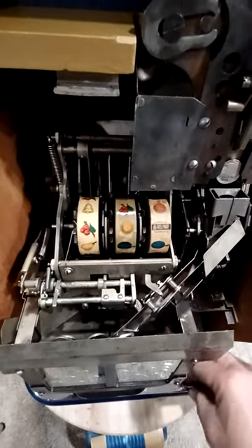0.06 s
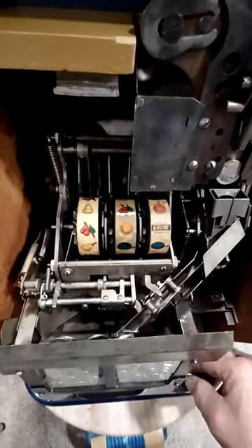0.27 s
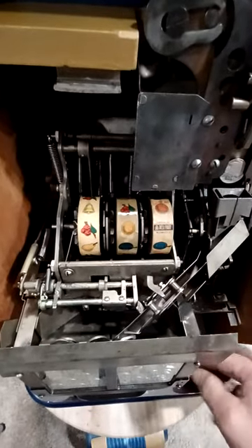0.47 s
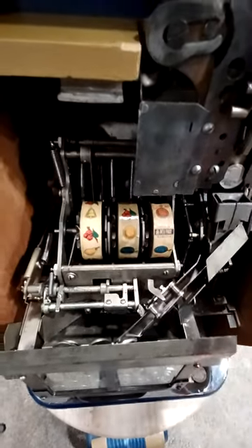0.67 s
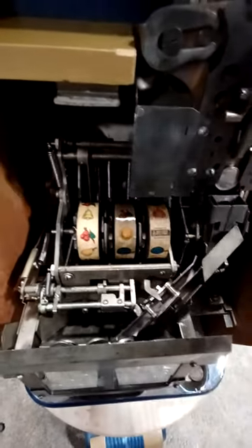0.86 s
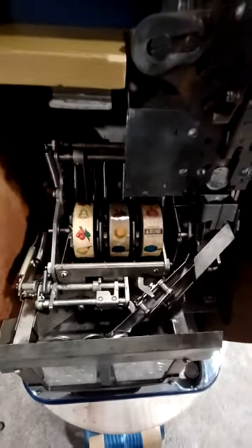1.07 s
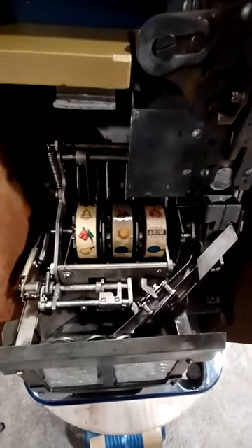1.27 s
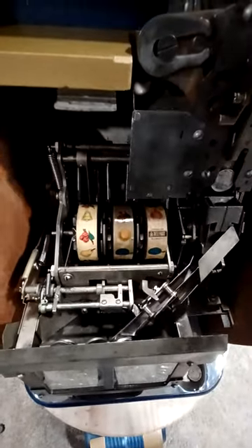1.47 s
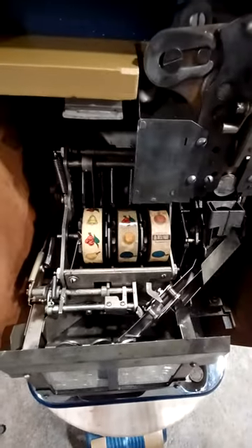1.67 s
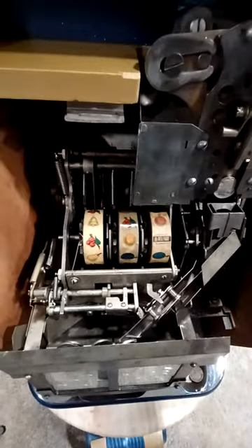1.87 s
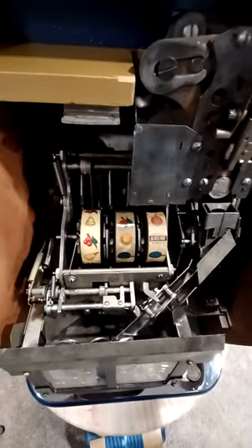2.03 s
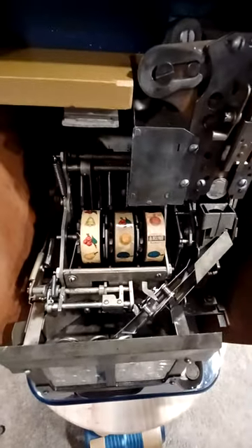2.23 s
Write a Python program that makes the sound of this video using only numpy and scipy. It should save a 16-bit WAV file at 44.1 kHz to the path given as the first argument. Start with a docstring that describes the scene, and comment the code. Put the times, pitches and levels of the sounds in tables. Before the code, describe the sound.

Heard up close in a small room, an old slot machine gives a loud metal clack over whirring gears and thin spring scrapes. The whir dies away, followed by irregular sharp clicks, brief rasps and a light hollow clunk.

```python
"""A small room, a stereo microphone close to the open mechanism of an old slot machine as it cycles.
The clockwork whirs and runs down while a heavy lever clacks home and a spring sticks and scrapes.
Then steel pawls and latches click at uneven times, each shaking the frame; a latch rasps over its
catch, and parts clunk to rest on the hollow housing. The near walls add a short tail."""
import sys
import numpy as np
from scipy import signal
from scipy.fft import rfft, irfft
from scipy.io import wavfile

SR = 44100
rng = np.random.default_rng(int(sys.argv[2]) if len(sys.argv) > 2 else 0)


def bounce(signal):
    """Save signal as a 16-bit WAV file at the path given by the first command-line argument."""
    frames = np.transpose(np.atleast_2d(signal))
    limited = np.clip(frames, -1, 1)
    pcm = np.round(limited * 32767).astype(np.int16)
    wavfile.write(sys.argv[1], SR, pcm)


N = 101429

# the lever's blows: start_s, body_db, treble_db
LEVER_BLOWS = [(.1798, -32, -22), (.1848, -23.5, -14), (.1878, -21, -22), (.1908, -28, -16),
               (.2333, -37, -28), (.369, -42.5, -22.5)]
# its dense clash as a spectrum: freq_hz, level_db
LEVER_SPECTRUM = [(530, -31), (900, -16), (1570, -3.5), (2660, -5.5), (4920, -4), (9090, -12.5), (11600, 0),
                  (16000, -8.5)]
# its distinct modes: pitch_hz, level_db, t60_s
LEVER_MODES = [(2080, -9.5, 0.26), (2900, -7.5, 0.1), (4140, -9, 0.044), (4930, 0, 0.028),
               (6300, 6.5, 0.025), (6780, -1, .06), (13800, 6, 0.029)]
def lever():
    """The heavy lever clacks home, steel on steel, close to the microphone."""
    return steel(LEVER_BLOWS, LEVER_SPECTRUM, LEVER_MODES, dense_t60_s=0.064, modes_db=-7.5,
                 body_gain_db=1, treble_gain_db=-10.5, frame_db=-21.5)


# latch snaps: start_s, body_db, treble_db
LATCH_SNAPS = [(1.4153, -42, -19.5), (1.422, -27.5, -60), (1.431, -30, -25.5), (1.4849, -31.5, -25),
               (1.524, -36.5, -36), (1.569, -44.5, -41.5), (1.69, -23.5, -18.5), (1.7155, -31, -27),
               (1.784, -26, -22), (1.8016, -32, -29), (1.822, -34, -31), (1.853, -36, -35.5),
               (1.895, -32, -37), (1.99, -34.5, -25.5), (2.0105, -30, -25.5), (2.05, -44, -36.5),
               (2.138, -43.5, -53), (2.191, -39, -49.5), (2.233, -48.5, -55)]
# a latch's dense clash as a spectrum: freq_hz, level_db
LATCH_SPECTRUM = [(1000, -54), (1590, -12.5), (2050, -5), (3050, -11.5), (4020, -5.5), (7350, -14.5),
                  (13300, -3.5), (16000, -2.5)]
# its distinct modes: pitch_hz, level_db, t60_s
LATCH_MODES = [(1980, -4, .035), (2080, -.5, .065), (2486, -6, .06), (3930, -6, .07), (5300, -3, .035),
               (5650, -8, .045), (6640, -7, .045), (8800, -11, .04), (10700, -7, .05), (13350, 8, .065),
               (15700, 0, .06)]
def latches():
    """Bright latches snap and rebound."""
    return steel(LATCH_SNAPS, LATCH_SPECTRUM, LATCH_MODES, dense_t60_s=0.14, modes_db=-1.5,
                 body_gain_db=-4.5, treble_gain_db=-3.5, frame_db=-17)


# pawl drops: start_s, body_db, treble_db
PAWL_DROPS = [(1.0653, -38, -31.5), (1.1062, -36, -27), (1.1122, -27, -31), (1.154, -28, -38.5),
              (1.288, -41.5, -40.5), (1.3137, -32, -29), (1.317, -22, -30.5), (1.331, -30.5, -35),
              (1.353, -46, -33.5), (1.3585, -33, -32.5)]
# a pawl's dense clash as a spectrum: freq_hz, level_db
PAWL_SPECTRUM = [(590, -59.5), (1000, -27), (1850, 4.5), (3120, -2), (3580, 10.5), (4680, -10.5),
                 (6550, -9), (8260, -31), (12700, -20), (16000, -18.5)]
# its distinct modes: pitch_hz, level_db, t60_s
PAWL_MODES = [(1870, -8, .33), (2070, -8, .08), (2560, 4, .03), (3480, 2, .03), (3700, 0, .04),
              (13700, -6, .04)]
def pawls():
    """Light pawls drop with short clicks."""
    return steel(PAWL_DROPS, PAWL_SPECTRUM, PAWL_MODES, dense_t60_s=0.048, modes_db=-3.5,
                 body_gain_db=-5, treble_gain_db=-2, frame_db=-27)


# the frame's dense modes as a spectrum: freq_hz, level_db
FRAME_SPECTRUM = [(70, -37.5), (130, -0.5), (180, -35.5), (250, 14), (380, -4), (900, -15), (1600, -7.5),
                  (4000, -61)]
# its distinct modes: pitch_hz, level_db, t60_s
FRAME_MODES = [(153, -20, 0.18), (238.9, 1.5, 0.18), (281.8, 5, 0.16), (375, -10.5, .22), (871, -11, 0.29)]
def steel(blows, spectrum, modes, dense_t60_s, modes_db, body_gain_db, treble_gain_db, frame_db):
    """Steel on steel: a contact crack, a dense clash, a few ringing pitches, the frame swelling after."""
    out, t = np.zeros((2, N)), np.arange(SR // 3) / SR
    contact_s, frame_attack_s = .0004, .008
    crack = undb(6.5) * fade(t, t60_s=.012)
    envelope = (fade(t, dense_t60_s) + crack) * rise(t, contact_s)
    for start_s, body_db, treble_db in blows:
        hit = at_level(noise(spectrum, len(t)) * envelope, 0) + at_level(ring(modes, t), modes_db)
        body, treble = split(hit, hz=8230)
        shake = at_level(noise(FRAME_SPECTRUM, len(t)) * fade(t, 0.19), 0)
        shake += at_level(ring(FRAME_MODES, t), 0.52)
        add(out, start_s, at_level(body, body_db + body_gain_db))
        add(out, start_s, at_level(treble * fade(t, .16), treble_db + treble_gain_db))
        add(out, start_s, at_level(shake * rise(t, frame_attack_s, power=2), body_db + frame_db))
    return out


# scrapes of the spring: start_s, length_s, level_db
SCRAPES = [(0.225, 0.018, -35.5), (0.271, 0.031, -33), (0.305, .022, -30.5), (0.399, 0.03, -22),
           (0.433, 0.039, -37.5), (0.502, 0.051, -33), (0.598, 0.043, -46.5)]
# their hiss: freq_hz, level_db
SPRING_SPECTRUM = [(3000, -14), (6000, -16.5), (8500, -21.5), (9300, -14.5), (9700, 3), (10400, -14),
                   (12500, -16.5), (13500, 2.5), (13980, 3.5), (14300, 1), (16000, -26.5)]
def spring(slip_hz=170, sing_hz=14015, sing_db=-18):
    """A spring sticks and slips along its seat, and sings on thinly after each scrape."""
    out, t = np.zeros((2, N)), np.arange(SR) / SR
    for start_s, length_s, level_db in SCRAPES:
        slips = bursts(ticks(slip_hz, jitter=.3, scatter_db=1.5), t60_s=0.059)[-len(t):]
        envelope = rise(t, 0.002) * fade(np.maximum(t - length_s / 2, 0), t60_s=0.023)
        sing = np.sin(2 * np.pi * (rng.normal(sing_hz, 25) * t + rng.random((2, 1)))) * fade(t, 1.1)
        scrape = noise(SPRING_SPECTRUM, len(t)) * slips * envelope
        add(out, start_s, undb(level_db) * (scrape + undb(sing_db) * sing))
    return out


# dull knocks on the casing: start_s, level_db
KNOCKS = [(.187, -27.5), (0.237, -33.5), (0.371, -30), (1.111, -42.5), (1.36, -41.5), (1.716, -43),
          (2.004, -42.5)]
# the casing's dense modes as a spectrum: freq_hz, level_db
CASING_SPECTRUM = [(100, -36.5), (300, 7), (600, -1.5), (880, 4), (1500, -5.5), (2500, 0), (6000, -57)]
# its distinct modes: pitch_hz, level_db, t60_s
CASING_MODES = [(235.4, 6.5, 0.11), (679, 1.5, 0.027), (820, -1, .05), (900, -2, .05), (1155, -4, 0.05),
                (1585, -4.5, 0.05)]
# thuds of the whole machine on its stand: start_s, level_db
THUDS = [(0.19, -29.5), (0.374, -45), (1.422, -49)]
# the stand's low thump: freq_hz, level_db
STAND_SPECTRUM = [(25, -23.5), (70, -12.5), (130, -5), (200, -9.5), (600, -43.5)]
def casing():
    """Dull knocks ring the casing; a few blows also thump the stand."""
    out, t = np.zeros((2, N)), np.arange(SR // 3) / SR
    for start_s, level_db in KNOCKS:
        knock = at_level(noise(CASING_SPECTRUM, len(t)) * fade(t, 0.13), 0)
        knock += at_level(ring(CASING_MODES, t), -5.1)
        add(out, start_s, at_level(knock * rise(t, 0.0045), level_db))
    for start_s, level_db in THUDS:
        thud = noise(STAND_SPECTRUM, len(t)) * fade(t, 0.064) * rise(t, 0.0019)
        add(out, start_s, at_level(thud, level_db))
    return out


# drags of a latch: start_s, length_s, level_db
DRAGS = [(1.404, .014, -43), (1.603, 0.039, -46), (1.683, 0.0082, -28), (1.789, 0.015, -26.5),
         (1.878, 0.032, -31), (1.995, 0.024, -26)]
def latch_drags(bounce_hz=380):
    """A latch drags over its catch: tiny bounces run together into a short rasp."""
    out, t = np.zeros((2, N)), np.arange(SR // 3) / SR
    for start_s, length_s, level_db in DRAGS:
        chatter = bursts(ticks(bounce_hz, jitter=.5, scatter_db=2), t60_s=.012)[:len(t)]
        release = fade(np.maximum(t - length_s, 0), t60_s=.024)
        add(out, start_s, undb(level_db) * noise(LATCH_SPECTRUM, len(t)) * chatter * release)
    return out


# parts landing on the housing: start_s, level_db
CLUNKS = [(2.14, -37), (2.193, -47.5)]
# the housing's walls: pitch_hz, level_db, t60_s
WALL_MODES = [(715, 0, .045), (790, -6, .12), (1040, -3, .04), (1520, 0, .05), (1900, -1, .035)]
def housing_clunks(cavity_hz=272, cavity_t60_s=.035, wall_db=-5, rattle_db=-4):
    """A part comes to rest on the hollow housing: the walls ring at once, the cavity booms just after."""
    out, t = np.zeros((2, N)), np.arange(SR // 3) / SR
    onset = rise(t, 0.00045)
    for start_s, level_db in CLUNKS:
        boom = at_level(ring([(cavity_hz, 0, cavity_t60_s)], t) * rise(t, .012, power=4), level_db)
        walls = at_level(ring(WALL_MODES, t) * onset, level_db + wall_db)
        rattle = at_level(noise(CASING_SPECTRUM, len(t)) * fade(t, 0.14) * onset, level_db + rattle_db)
        add(out, start_s, boom + walls + rattle)
    return out


# the drive running down: time_s, tooth_db, rumble_db
DRIVE_LEVELS = [(0, -44.5, -38.5), (0.166, -46.5, -47), (0.237, -37, -35), (.35, -44, -43.5),
                (.42, -39, -41), (.56, -46.5, -44), (.68, -48, -45.5), (0.81, -50.5, -51),
                (.9, -62.5, -57.5), (0.982, -74.5, -62), (1.06, -74, -62)]
# meshing teeth: freq_hz, level_db
TOOTH_SPECTRUM = [(700, -17.5), (1200, -2), (2400, -8), (4000, -26.5), (5300, -6), (6400, -15.5),
                  (8450, -30), (13800, 4), (16000, -14)]
# the gear wheel's resonance: freq_hz, level_db
WHEEL_SPECTRUM = [(2700, -33.5), (3040, -7), (3170, 5), (3300, -5), (3700, -13)]
# the frame's rumble: freq_hz, level_db
RUMBLE_SPECTRUM = [(24, -70), (40, -51.5), (139, -4), (182, -19), (248, 4.5), (350, -12.5), (397, -11),
                   (707, -15.5), (911, -8.5), (1460, -26.5), (3000, -33), (3900, -79.5)]
def clockwork(tooth_hz=68, grit_hz=260, grit_db=-4.5, rub_db=-5, wheel_db=-.5, frame_db=-14.5):
    """Gear teeth tick and rattle, ring the wheels and make the frame rumble until the drive runs down."""
    t = np.arange(N) / SR
    time_s, tooth_db, rumble_db = np.array(DRIVE_LEVELS).T
    pulses = ticks(tooth_hz, jitter=.2, scatter_db=2.5)
    pulses += undb(grit_db) * ticks(grit_hz, jitter=.7, scatter_db=3)
    teeth = noise(TOOTH_SPECTRUM, N) * np.hypot(bursts(pulses, t60_s=.03), undb(rub_db))
    wheels = undb(wheel_db) * noise(WHEEL_SPECTRUM, N) * bursts(pulses, t60_s=.06)
    frame = unit_rms(signal.fftconvolve(pulses[None], ring(FRAME_MODES, t[:SR // 3]))[:, :N])
    rumble = noise(RUMBLE_SPECTRUM, N) * bursts(pulses, t60_s=0.81) + undb(frame_db) * frame
    whir = undb(np.interp(t, time_s, tooth_db)) * (teeth + wheels)
    return whir + undb(np.interp(t, time_s, rumble_db)) * rumble


# room tone: freq_hz, level_db
ROOM_TONE = [(18, -39.5), (30, -14), (239, -1), (3220, -53), (3580, -27), (14400, -29.5), (16000, -40.5)]
def room(x, tail_db=-13, tone_db=-68):
    """Close walls give a short tail whose treble dies first, over faint room tone."""
    t = np.arange(SR // 2) / SR
    low, high = split(rng.standard_normal((2, len(t))), hz=2100)
    tail = (low * fade(t, t60_s=.32) + high * fade(t, t60_s=.19)) * rise(t, 0.0047, power=2)
    reverb = signal.fftconvolve(x, unit_rms(tail) / np.sqrt(len(t)), axes=1)[:, :N]
    return x + undb(tail_db) * reverb + undb(tone_db) * noise(ROOM_TONE, N)


def noise(spectrum, size, lag_s=0.0003754):
    """Coloured noise at two microphone ports: the right one lags, and the bass is the most alike."""
    hz = np.fft.rfftfreq(size, 1 / SR)
    left, unrelated = np.exp(2j * np.pi * rng.random((2, len(hz))))
    likeness = at_hz([(350, 1), (1200, 0.086)], hz)
    right = (likeness * left + np.sqrt(1 - likeness ** 2) * unrelated) * np.exp(-2j * np.pi * hz * lag_s)
    return unit_rms(irfft(np.array([left, right]) * undb(at_hz(spectrum, hz)), size))


def ring(modes, t, scatter_db=5, detune=.021):
    """Fading modes, weighted and detuned anew each blow; high ones reach the ports out of step."""
    out = 0
    for hz, level_db, t60_s in modes:
        phase = 2 * np.pi * (rng.random() + rng.random((2, 1)) * min(hz / 2500, 1))
        gain = undb(level_db + scatter_db * rng.standard_normal())
        pitch_hz = hz * (1 + detune * rng.uniform(-0.88, 1))
        out = out + gain * np.sin(2 * np.pi * pitch_hz * t + phase) * fade(t, t60_s)
    return out


def ticks(rate_hz, jitter, scatter_db):
    """A train of impulses, uneven in spacing and strength."""
    out = np.zeros(N)
    spacing, weight = rng.standard_normal((N // 50, 2)).T
    at = (np.cumsum(np.exp(jitter * spacing)) * SR / rate_hz).astype(int)
    out[at[at < N]] = undb(scatter_db * weight[at < N])
    return out


def bursts(pulses, t60_s):
    """The envelope of a fading burst at every impulse."""
    energy = signal.lfilter([1], [1, -fade(1 / SR, t60_s) ** 2], pulses ** 2 + 1e-12)
    return unit_rms(np.sqrt(energy))


def at_level(x, db, window_s=.018):
    """Sets the RMS level of the first moments of a blow."""
    return x * undb(db) / np.sqrt(np.mean(x[:, :int(window_s * SR)] ** 2))


def at_hz(points, hz):
    """Reads (Hz, value) points on a log-frequency axis."""
    freq_hz, values = np.array(points, float).T
    return np.interp(np.log(hz + 1), np.log(freq_hz), values)


def split(x, hz):
    """The parts below and above a frequency."""
    return [signal.sosfilt(signal.butter(4, hz, kind, fs=SR, output="sos"), x) for kind in ("low", "high")]


def rise(t, attack_s, power=1):
    return 1 - np.exp(-(t / attack_s) ** power)


def fade(t, t60_s):
    return np.exp(-np.log(1000) * t / t60_s)


def undb(db):
    return 10 ** (np.asarray(db) / 20)


def unit_rms(x):
    return x / np.sqrt(np.mean(x ** 2) + 1e-20)


def add(out, start_s, x):
    i = int(start_s * SR)
    out[:, i:i + x.shape[1]] += x[:, :max(N - i, 0)]


def scene():
    """One cycle of the machine, heard close up in the small room."""
    clicks = lever() + pawls() + latches()
    return room(clicks + latch_drags() + casing() + housing_clunks() + spring() + clockwork())


# balance at the microphone: freq_hz, left_minus_right_db
MIC_BALANCE = [(70, 11), (170, -4.5), (400, 5), (1200, -1.5), (2500, 2), (5000, 9.5), (9000, 2.5),
               (14000, 6)]
def record(dry, low_cut_hz=50, top_hz=15800):
    """The left port faces the machine and hears more of it; the deepest bass and the top are cut."""
    size = 2 * N
    lean_db = at_hz(MIC_BALANCE, np.fft.rfftfreq(size, 1 / SR))
    heard = irfft(rfft(dry, size) * undb(np.array([lean_db, -lean_db]) / 2), size)[:, :N]
    _, heard = split(heard, low_cut_hz)
    return signal.sosfilt(signal.ellip(8, .2, 70, top_hz, fs=SR, output="sos"), heard)


dry = scene()
out = record(dry)
bounce(out)
```